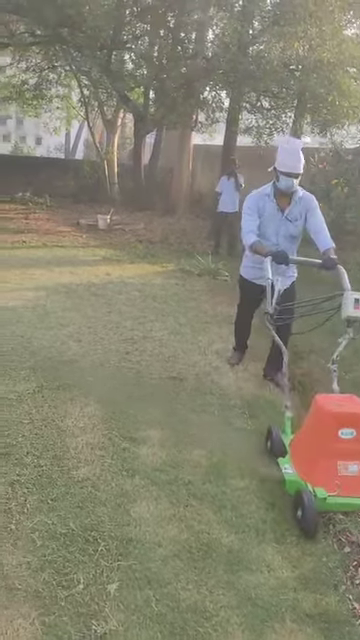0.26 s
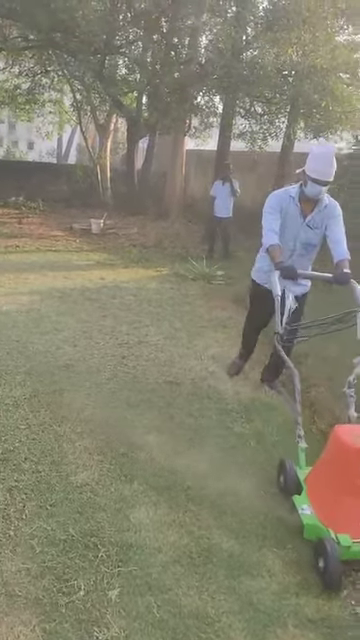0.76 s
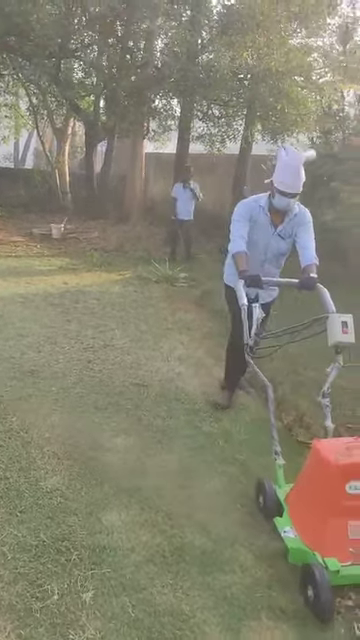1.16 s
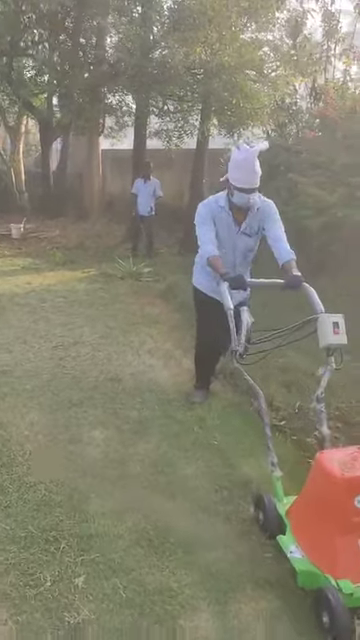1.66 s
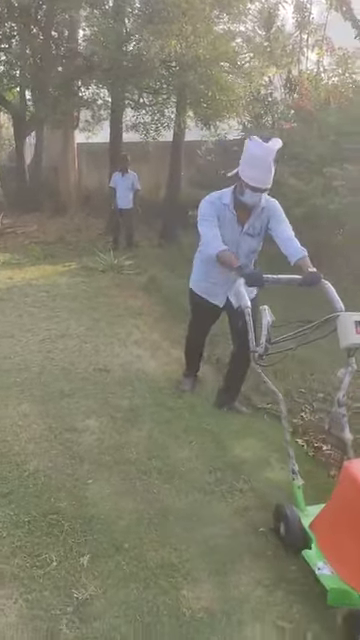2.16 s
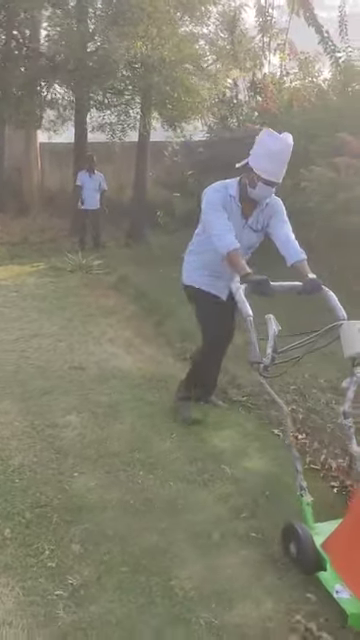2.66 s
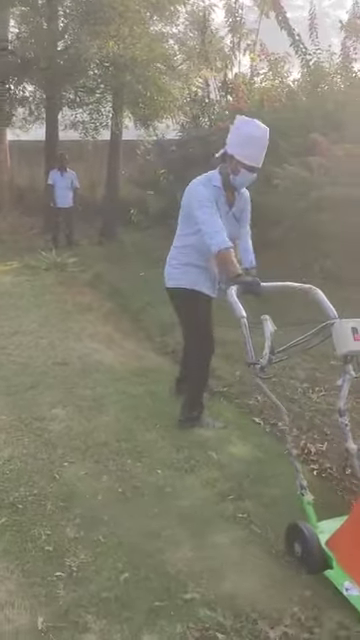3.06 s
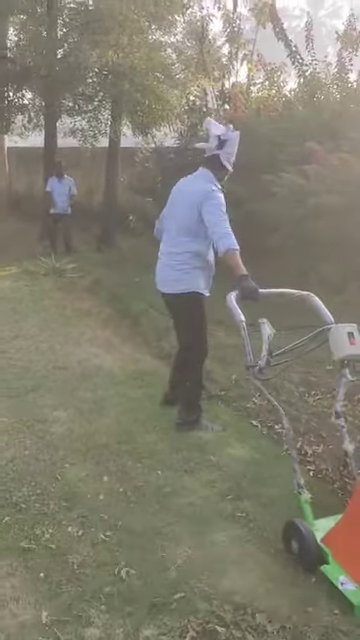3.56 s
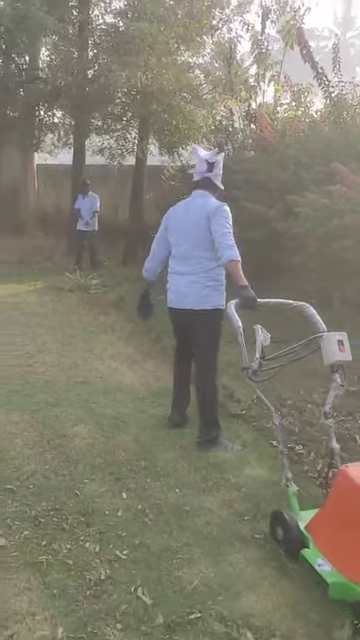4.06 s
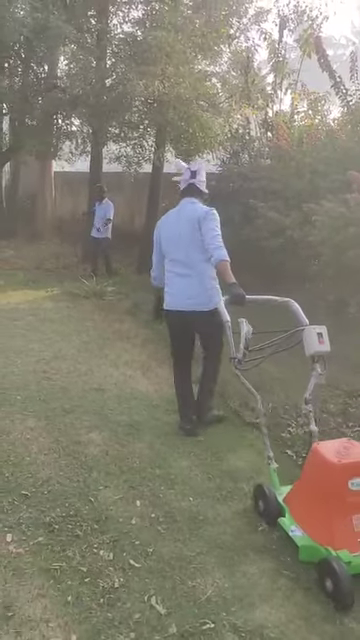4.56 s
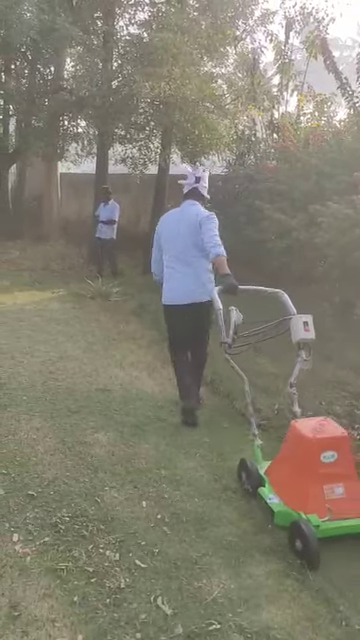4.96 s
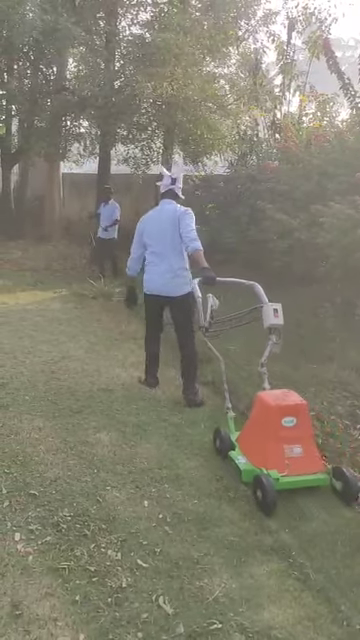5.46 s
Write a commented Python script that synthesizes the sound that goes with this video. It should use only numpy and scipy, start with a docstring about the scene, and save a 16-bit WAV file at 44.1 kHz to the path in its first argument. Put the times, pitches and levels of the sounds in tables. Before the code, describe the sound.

Outdoors, an electric mower passes with a throbbing hum and crisp grass-cutting hiss, then eases back, with distant caws and faint chirps.

```python
"""On a lawn, an electric mower is pushed past a phone, then drawn back.
Its blade hums on multiples of a shaft turning about 50 times a second, churns the air under the deck
and shreds grass, pelting the deck with clippings and flicking the odd twig.
Far off a crow caws four times and small birds chirp, over a faint rumble of breeze."""
import sys
import numpy as np
from scipy import signal
from scipy.fft import rfft, irfft
from scipy.io import wavfile
from scipy.ndimage import uniform_filter1d, map_coordinates

SR = 44100
rng = np.random.default_rng(int(sys.argv[2]) if len(sys.argv) > 2 else 0)


def transcribe(signal):
    """Save signal, clipped to [-1, 1], as a 16-bit WAV file at the path in sys.argv[1]."""
    frames = np.atleast_2d(signal).T
    limited = np.clip(frames, -1, 1)
    pcm = np.round(limited * 32767).astype(np.int16)
    wavfile.write(sys.argv[1], SR, pcm)


N = 252232
TIME = np.arange(N) / SR
BINS = np.fft.rfftfreq(N, 1 / SR)


def gain_of(db):
    """Decibels to amplitude."""
    return 10 ** (np.asarray(db) / 20)


def unit_rms(x):
    """Scales to rms 1."""
    return x / np.sqrt(np.mean(x ** 2) + 1e-20)


def automation(rows):
    """One curve per value column of a timed table, at every sample."""
    times, *columns = np.transpose(rows)
    return [np.interp(TIME, times, column) for column in columns]


def eq_curve(points):
    """A frequency table at every bin, joined on a log axis."""
    hz, value = np.transpose(points)
    return np.interp(np.log(BINS + 1), np.log(hz + 1), value)


def highpass(corner_hz):
    """A steep low cut, as a gain at every bin."""
    return 1 - 1 / (1 + (BINS / corner_hz) ** 8)


def add(mix, start_s, sound):
    """Mixes a sound in at its cue."""
    part = mix[..., round(start_s * SR):][..., :sound.shape[-1]]
    part += sound[..., :part.shape[-1]]


def wander(rate_hz):
    """A random modulator of rms 1, moving mostly below rate_hz."""
    return unit_rms(irfft(rfft(rng.standard_normal(N)) / (1 + (BINS / rate_hz) ** 2), N))


# How alike the noise layers are left and right, 1 being mono: freq_hz, correlation
STEREO_LIKENESS = [(30, 0.95), (100, 1), (350, 1), (1300, 0.85), (1600, 0.25), (1900, .45), (2350, .45),
                   (2650, .88), (3200, .65), (4300, 0.45), (5400, .62), (5850, 0.97), (6500, .35),
                   (7100, .8), (7700, .45), (8600, 0.4), (10000, .25), (15000, .12)]

def coloured(pair, spectrum):
    """Blends two drives into partly shared stereo with the given spectrum, at rms 1."""
    left, other = rfft(pair)
    likeness = np.clip(eq_curve(STEREO_LIKENESS), 0, 1)
    right = likeness * left + np.sqrt(1 - likeness ** 2) * other
    return unit_rms(irfft(np.array([left, right]) * gain_of(eq_curve(spectrum)), N))


def patchy(x, depth_db, patch_bins=4, patch_frames=8):
    """Each band swells and sinks on its own for a few tens of milliseconds."""
    bands = signal.stft(x, nperseg=256)[2]
    swell = uniform_filter1d(rng.standard_normal(bands.shape[1:]), patch_bins, 0)
    swell = unit_rms(uniform_filter1d(swell, patch_frames, 1))
    return unit_rms(signal.istft(bands * gain_of(depth_db * swell), nperseg=256)[1][:, :N])


# Low rumble bed: freq_hz, level_db
BREEZE_EQ = [(10, -1), (28, 8), (60, 10), (120, -20), (400, -56)]

def breeze(level_db=-59.0):
    """A faint rumble of air at the microphone."""
    return gain_of(level_db) * coloured(rng.standard_normal((2, N)), BREEZE_EQ)


# Distant chirp cues: start_s, length_s, start_hz, end_hz, level_db
CHIRP_CUES = [(1.046, .028, 2720, 2680, -50), (4.675, .03, 2650, 2780, -56), (4.9, .07, 4780, 3900, -57),
              (5.508, .03, 3950, 3200, -58), (5.542, .05, 5050, 4100, -57.5)]

def small_birds(blur=.022, warble=.018, warble_hz=75):
    """Quick gliding chirps with a warbling burr."""
    out, jitter = np.zeros(N), wander(302.0)
    for start_s, length_s, start_hz, end_hz, level_db in CHIRP_CUES:
        count = round(length_s * SR)
        trill = np.sin(2 * np.pi * warble_hz * TIME[:count])
        burr = 1 + warble * trill + blur * jitter[round(start_s * SR):][:count]
        pitch_hz = np.linspace(start_hz, end_hz, count) * burr
        swell = np.sqrt(np.hanning(count)) * (1 + trill / 2)
        chirp = np.sin(2 * np.pi * np.cumsum(pitch_hz) / SR) * swell
        add(out, start_s, gain_of(level_db) * unit_rms(chirp))
    return out


# Colour of the crow's throat: freq_hz, level_db
THROAT_EQ = [(800, -17), (1300, 6), (1600, 6), (1820, 3), (2100, -31), (2400, -5), (2800, -45), (4000, -36)]
# Caw cues, pitched by the crest of the third partial: start_s, length_s, crest_hz, level_db
CAW_CUES = [(.83, .27, 1574, -35.3), (1.69, .26, 1580, -36.3), (2.53, .24, 1660, -35),
            (3.32, .25, 1600, -38)]

def crow(arch=.13, rasp=.012, clear_db=-1.8, side_db=-19, hoarse_db=-2, right_db=-4):
    """Arched calls from the left that start hoarse and clear up; the throat favours the third partial."""
    out, jitter = np.zeros(N), wander(150)
    croak = unit_rms(coloured(rng.standard_normal((2, N)), THROAT_EQ)[0])
    for start_s, length_s, crest_hz, level_db in CAW_CUES:
        arc = np.linspace(-1, 1, round(length_s * SR))
        span = round(start_s * SR) + np.arange(len(arc))
        third_hz = crest_hz * (1 - arch * arc ** 2 + rasp * jitter[span])
        phase = 2 * np.pi * np.cumsum(third_hz) / SR / 3
        below, main, above = np.sin(np.outer([2, 3, 4], phase))
        clear = gain_of(clear_db) * unit_rms(main + gain_of(side_db) * (below + above)) * (1 + arc / 2)
        hoarse = gain_of(hoarse_db) * croak[span] * (1 - arc / 2)
        add(out, start_s, gain_of(level_db) * (clear + hoarse) * (1 - arc ** 2))
    return out * gain_of([[0], [right_db]])


# Twig and grit hits, the rattle set against its snap: start_s, snap_db, rattle_db
TWIG_HITS = [(0.8055, -20, -11), (0.856, -22, -10), (1.522, -15.5, -7), (1.5655, -22, -14),
             (1.8255, -20.5, -14), (2.076, -18.5, -14), (2.246, -20, -10), (2.583, -19.5, -12),
             (2.854, -21, -12), (3.0626, -19, -10), (3.2025, -20.5, -8), (3.3633, -19, -6),
             (4.025, -26.5, -7), (4.2053, -16.5, -22)]

def twigs(snap_s=.0015, rattle_s=.016, trim_db=-12.7, shelf_hz=10500, shelf_db=4):
    """Each twig the blade strikes gives a dry, bright snap, then a short rattle of splinters."""
    envelope, t = np.zeros(N), TIME[:4096]
    for start_s, snap_db, rattle_db in TWIG_HITS:
        decay = np.hypot(np.exp(-t / snap_s), gain_of(rattle_db) * np.exp(-t / rattle_s))
        add(envelope, start_s, gain_of(snap_db + trim_db) * decay)
    splinters = coloured(rng.standard_normal((2, N)), SHRED_EQ)
    return envelope * irfft(rfft(splinters) * gain_of(shelf_db * highpass(shelf_hz)), N)


def pelted_deck(ring_hz=1670, width_hz=380, trim_db=-9.0, drift_hz=90):
    """Flung clippings keep the deck ringing; its damped resonance shifts as it rides over the lawn."""
    load_db, = automation(GRASS_LOAD)
    resonance = 1 / (1 + 2j * (BINS - ring_hz) / width_hz) ** 2
    ring = signal.hilbert(irfft(rfft(rng.standard_normal((2, N))) * resonance, N))
    shift = np.exp(2j * np.pi * np.cumsum(drift_hz * wander(3)) / SR)
    return gain_of(load_db + trim_db) * unit_rms((ring * shift).real)


def blade_bites(turns, share=.35, spread_db=2.8, scatter=.17, decay_s=.0025):
    """Each blade end bites off a tuft of its own size: a burst of gain that dies before the next."""
    passes = np.floor(2 * turns + scatter * wander(60))
    onsets = np.diff(np.maximum.accumulate(passes), prepend=passes[0])
    tufts = gain_of(spread_db * np.clip(rng.standard_normal(N), -2, 2))
    power = signal.lfilter([1], [1, -np.exp(-1 / (decay_s * SR))], onsets * tufts ** 2)
    return np.sqrt(1 - share + share * power / power.mean())


# Crisp colour of shredding, shared with the twigs: freq_hz, level_db
SHRED_EQ = [(1500, -14.5), (3000, 10.5), (3800, -4.5), (4250, -10), (4600, 6.5), (5400, 2.5), (5900, 1),
            (7500, 0), (9000, 2), (10500, -4), (12500, -7), (14000, 0.5), (15500, -13)]
# How much grass the blade meets, a fader for the hiss and the deck ring: time_s, level_db
GRASS_LOAD = [(0.0, -33), (0.16, -38), (0.32, -34), (0.52, -35), (0.61, -33), (0.7, -36.5), (0.85, -33.5),
              (1.17, -36), (1.48, -36.5), (1.54, -34), (2.1, -33), (2.3, -31.5), (2.8, -32), (2.98, -34),
              (3.1, -31), (3.34, -31.5), (3.45, -35.5), (3.63, -37.5), (4.9, -41), (5.1, -44),
              (5.72, -43.5)]

def shredded_grass(turns, snaps_per_s=2500, snap_share=0.27, tuft_db=0.5, tuft_hz=5,
                   bright_hz=11000, brightening=0.96, trim_db=-6.5):
    """Stalks snap in clumps over a fine hiss of clippings; thick grass sounds brighter."""
    load_db = automation(GRASS_LOAD)[0] + tuft_db * wander(tuft_hz)
    sizes = gain_of(-0.5 * np.minimum(rng.exponential(1, N), 4))
    struck = rng.random(N) < snaps_per_s / SR
    snaps = unit_rms(sizes * struck * rng.choice([-1., 1.], (2, N)))
    drive = np.sqrt(snap_share) * snaps + np.sqrt(1 - snap_share) * rng.standard_normal((2, N))
    hiss = patchy(coloured(drive * blade_bites(turns), SHRED_EQ), depth_db=1.3)
    sizzle = irfft(rfft(hiss) * highpass(bright_hz), N)
    lift = gain_of(brightening * (load_db - load_db.mean())) - 1
    return gain_of(load_db + trim_db) * (hiss + lift * sizzle)


# Low body under the deck: freq_hz, level_db
BOOM_EQ = [(30, -25), (75, -18.5), (120, -17.5), (170, -4.5), (245, 0), (330, -1.5), (440, -17.5),
           (700, -24), (2000, -42.5)]
# Broad rush off the blade tips: freq_hz, level_db
RUSH_EQ = [(100, -9), (300, 4), (480, 0.5), (720, 2), (900, 0.5), (1100, -2.5), (1350, -2.5), (1700, -10.5),
           (2050, -16.5), (2400, -22), (2950, -15.5), (3700, -18.5), (4250, -34), (4700, -24),
           (9000, -46.5)]
# Air faders as the mower comes near and draws back: time_s, boom_db, rush_db
AIR_FADERS = [(0.0, -41.5, -35.5), (0.8, -40.5, -36), (1.25, -38.5, -36), (1.75, -40.5, -35),
              (2.45, -39.5, -33), (3.35, -43, -32.5), (4.15, -40.5, -34), (5.0, -45.5, -36),
              (5.72, -43.5, -38)]

def churned_air(turns, boom_trim_db=9.0, rush_trim_db=4.5):
    """Turbulence booms in the deck and rushes off the blade tips, pulsing as they pass its walls."""
    boom_db, rush_db = automation(AIR_FADERS)
    pulsing = 1 + .21 * np.cos(4 * np.pi * turns) + .14 * np.cos(8 * np.pi * turns)
    rush = coloured(pulsing * rng.standard_normal((2, N)), RUSH_EQ)
    eddies = patchy(rush, depth_db=1.0, patch_bins=3, patch_frames=16)
    boom_gain = gain_of(boom_db + boom_trim_db + 1.1 * wander(4.9))
    boom = coloured(rng.standard_normal((2, N)), BOOM_EQ)
    return boom_gain * boom + gain_of(rush_db + rush_trim_db) * eddies


# Motor speed, labouring a little in the first, taller grass: time_s, turns_per_s
SHAFT_SPEED = [(0.0, 49.3), (0.2, 49.3), (0.42, 48.8), (0.58, 49.45), (0.85, 49.35), (1.3, 49.4),
               (1.7, 49.65), (2.3, 49.85), (2.7, 49.68), (4.5, 49.8), (5.72, 49.68)]

def shaft_turns():
    """The shaft's running count of turns, the clock for hum, air pulses and bites."""
    return np.cumsum(automation(SHAFT_SPEED)[0]) / SR + rng.random()


def hollow_lag(order, resonance_hz=265, width_hz=70):
    """Cycles by which the resonant hollow under the deck holds back a shaft order."""
    hz = order * np.mean(SHAFT_SPEED, 0)[1]
    return np.arctan2(hz * width_hz, resonance_hz ** 2 - hz ** 2) / np.pi


def shaft_tone(cycles, unrest, rate_hz, drift_cycles=.04):
    """A shaft order shaken by uneven inflow; its phase drifts as the paths over the lawn change."""
    shake = 1 + unrest * (wander(rate_hz) + 1j * wander(rate_hz))
    phase = 2 * np.pi * (cycles + drift_cycles * wander(1.08))
    return unit_rms((shake * np.exp(1j * phase)).real)


# Buzz of the weaker orders, set against their shared fader: shaft_order, level_db
BUZZ_PARTIALS = [(1, -20.5), (3, -3.5), (5, -6.5), (7, -12), (9, -28), (10, -8.5), (12, -9.5), (14, -7.5),
                 (16, -13.5), (18, -11), (20, -32), (22, -29)]
# Slow faders for the second-order drone and the buzz: time_s, drone_db, buzz_db
DRONE_FADERS = [(0.0, -37.5, -34.5), (0.65, -37.5, -34.5), (1.33, -41, -30.5), (1.75, -37, -35),
                (2.7, -36, -32.5), (3.3, -37.5, -32.5), (4.15, -35, -35.5), (4.95, -36.5, -38.5),
                (5.72, -41.5, -42.5)]
# Main hum, fourth order: time_s, level_db
HUM_FADER = [(0.0, -30.5), (0.16, -42), (0.28, -31), (0.38, -27.5), (0.48, -44), (0.62, -31), (0.73, -26),
             (0.86, -44), (0.96, -25.5), (1.1, -25.5), (1.22, -30), (2.09, -30), (2.19, -38), (2.33, -27.5),
             (2.48, -25.5), (2.56, -40), (2.68, -37), (2.82, -26), (3.2, -24.5), (3.95, -25.5), (4.06, -43),
             (4.16, -24.5), (4.32, -30.5), (4.43, -32), (4.78, -28.5), (5.16, -32), (5.24, -24),
             (5.4, -35.5), (5.48, -26.5), (5.72, -30)]
# Sixth order, surging and dropping out: time_s, level_db
SURGE_FADER = [(0.0, -44), (0.26, -41), (0.45, -26.5), (0.55, -41), (0.63, -32), (0.76, -35), (0.86, -33),
               (1.0, -36), (1.33, -27.5), (1.53, -44), (1.74, -31.5), (1.88, -39), (1.98, -40), (2.07, -31),
               (2.15, -34), (2.27, -28.5), (2.45, -31), (2.52, -28), (2.6, -39), (2.68, -31), (2.78, -41),
               (2.88, -28), (3.0, -25.5), (3.05, -34), (3.11, -28), (3.22, -39.5), (3.36, -29.5),
               (3.56, -47), (3.76, -27), (3.96, -40), (4.08, -31.5), (4.28, -46), (4.47, -26.5), (4.6, -40),
               (4.72, -37), (4.88, -29), (4.96, -41), (5.08, -32.5), (5.25, -35.5), (5.39, -33),
               (5.48, -56), (5.72, -46)]
# Cleaner whine, eighth order: time_s, level_db
WHINE_FADER = [(0.0, -35), (0.15, -37), (0.24, -39.5), (0.49, -39), (0.56, -30.5), (0.72, -36.5),
               (1.25, -34.5), (1.65, -33), (2.08, -34.5), (2.21, -37.5), (2.36, -34), (2.54, -47),
               (2.62, -37), (2.84, -29.5), (3.12, -42), (3.5, -40.5), (3.82, -35), (4.6, -39.5),
               (5.72, -39.5)]

def blade_hum(turns, waver_turns=0.0031, waver_hz=8):
    """A two-ended blade: even orders throb once per pass, odd ones come from slight imbalance."""
    drone_db, buzz_db = automation(DRONE_FADERS)
    hum_db, = automation(HUM_FADER)
    surge_db, = automation(SURGE_FADER)
    whine_db, = automation(WHINE_FADER)
    turns = turns + waver_turns * wander(waver_hz)  # tufts make the shaft waver
    second, fourth, sixth, eighth = [order * turns - hollow_lag(order) for order in (2, 4, 6, 8)]
    hum = gain_of(drone_db + 3.5) * shaft_tone(second, unrest=0.04, rate_hz=7)
    hum += gain_of(hum_db + 3.5) * shaft_tone(fourth, unrest=0.07, rate_hz=14)
    hum += gain_of(surge_db + 3.0) * shaft_tone(sixth, unrest=0.15, rate_hz=12, drift_cycles=.15)
    hum += gain_of(whine_db + 3.5) * shaft_tone(eighth, unrest=0.06, rate_hz=8)
    for order, level_db in BUZZ_PARTIALS:
        cycles = order * turns + rng.random()
        hum += gain_of(buzz_db + level_db) * shaft_tone(cycles, unrest=0.8, rate_hz=9, drift_cycles=.2)
    return hum


# The mower's place, panned by how late the right side hears it: time_s, delay_samples
MOWER_PAN = [(0, 3.7), (.7, 6.1), (1.5, 7.75), (2.5, 8.5), (4.2, 8.1), (4.8, 6.6), (5.3, 5.4), (5.72, 4)]

def scene():
    """The mower moves against birds and breeze, reaching the right port late by a changing amount."""
    turns = shaft_turns()
    left, right = blade_hum(turns) + churned_air(turns) + shredded_grass(turns) + pelted_deck() + twigs()
    delay_samples, = automation(MOWER_PAN)
    right = map_coordinates(right, [np.arange(N) - delay_samples], order=5, mode="mirror")
    return np.array([left, right]) + crow() + small_birds() + breeze()


# Treble peaks of the microphone ports, left then right: resonance_hz, width_hz
MIC_PORTS = [(8896, 900), (7850, 770)]
# The phone's body shading the right port, set against the left: freq_hz, gain_db
SHADE_EQ = [(60, -9), (280, -9.5), (520, -7.5), (850, -3.5), (1550, -9), (2000, 0.5), (2600, 2.5),
            (3000, -10.5), (4200, 2.5), (4800, -6), (6000, -1.5), (8000, -5), (9700, -7.5), (14000, -4.5)]

def record(dry, cutoff_hz=15400):
    """Each port rings at its own treble resonance, the right one is shaded; then a steep high cut."""
    ports = np.array([1 / (1 - (BINS / hz) ** 2 + 1j * BINS * width / hz ** 2) for hz, width in MIC_PORTS])
    shade = np.array([np.ones(len(BINS)), gain_of(eq_curve(SHADE_EQ))])
    heard = irfft(rfft(dry) * ports * shade, N)
    high_cut = signal.firwin(511, cutoff_hz, window=("kaiser", 9), fs=SR)
    return signal.oaconvolve(heard, high_cut[None], "same")


dry = scene()
out = record(dry)
transcribe(out)
```